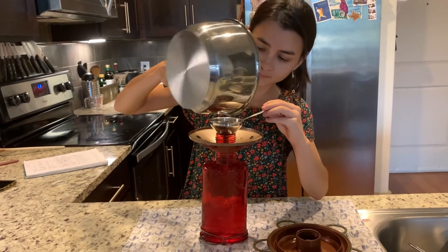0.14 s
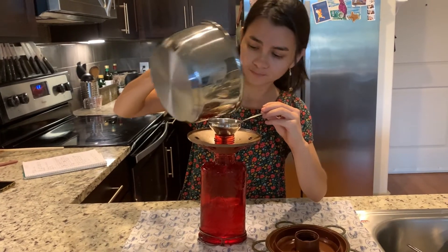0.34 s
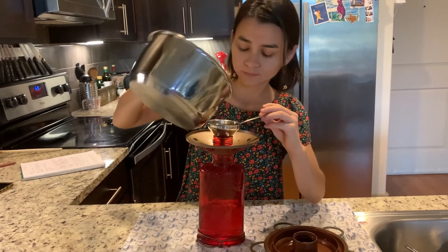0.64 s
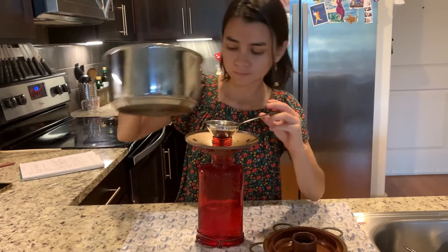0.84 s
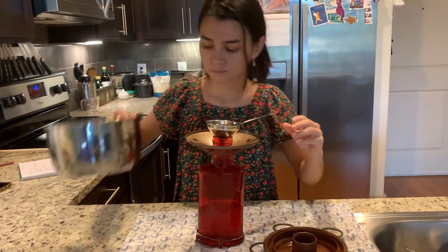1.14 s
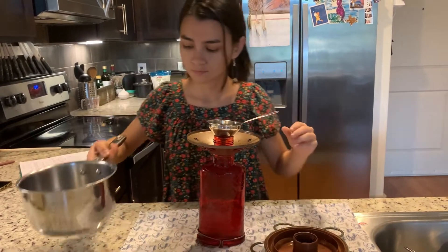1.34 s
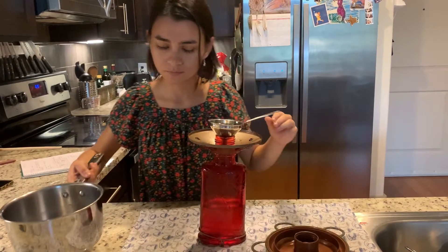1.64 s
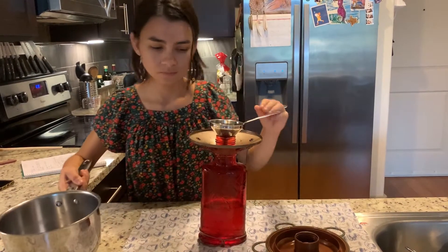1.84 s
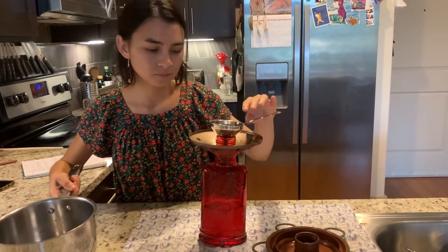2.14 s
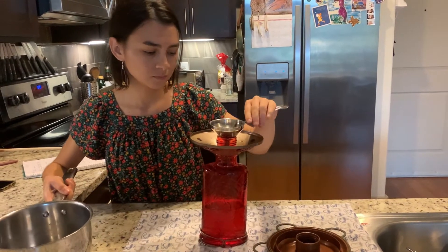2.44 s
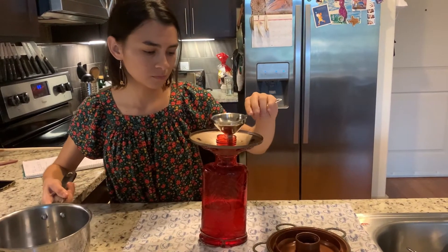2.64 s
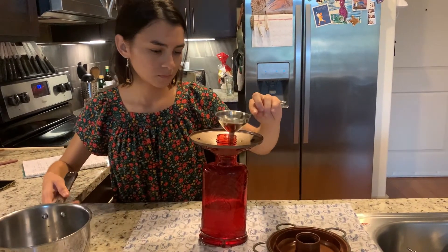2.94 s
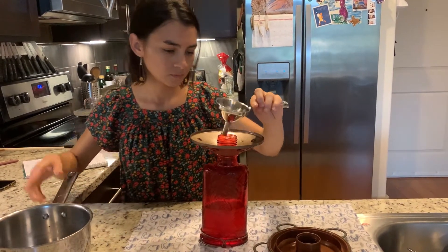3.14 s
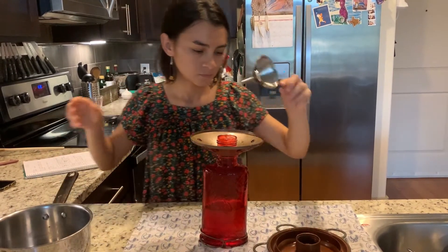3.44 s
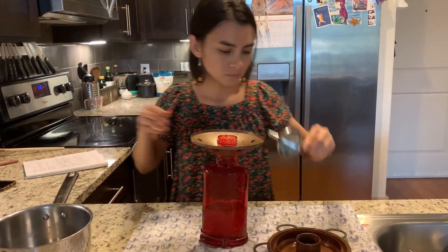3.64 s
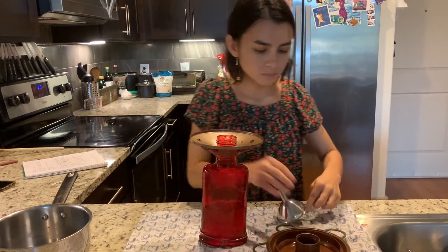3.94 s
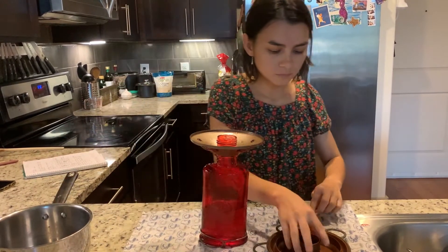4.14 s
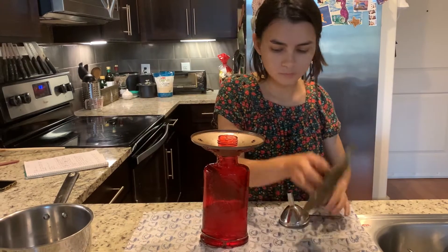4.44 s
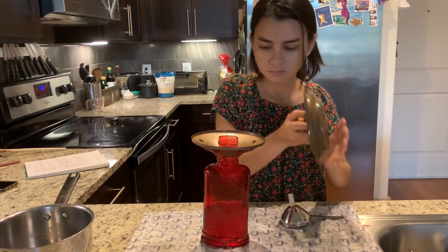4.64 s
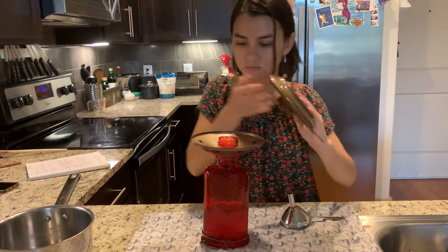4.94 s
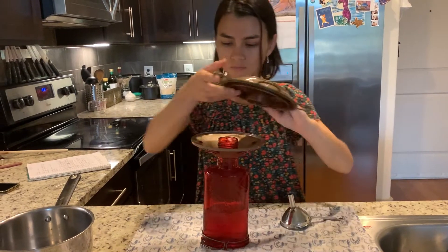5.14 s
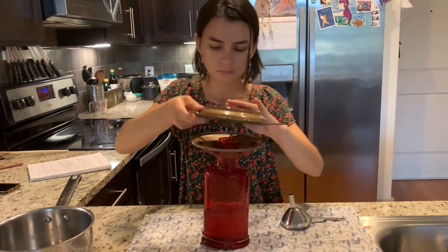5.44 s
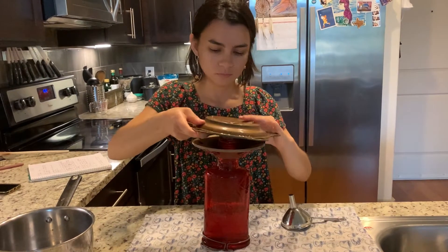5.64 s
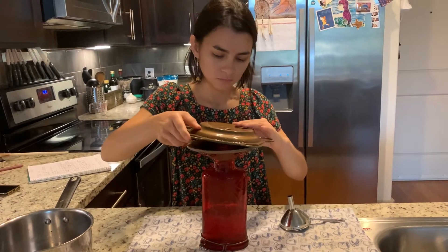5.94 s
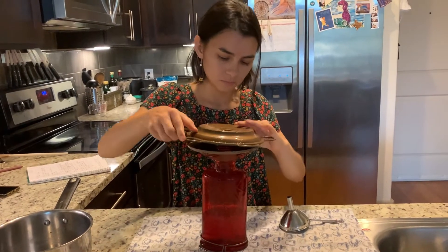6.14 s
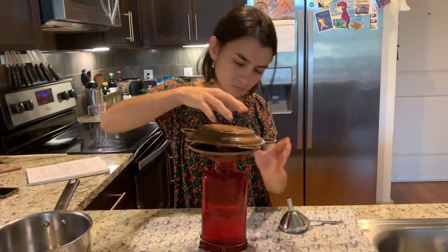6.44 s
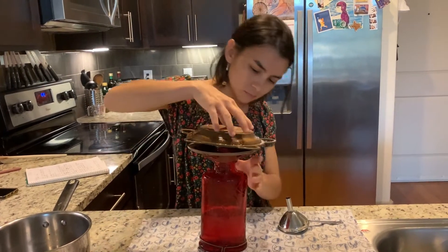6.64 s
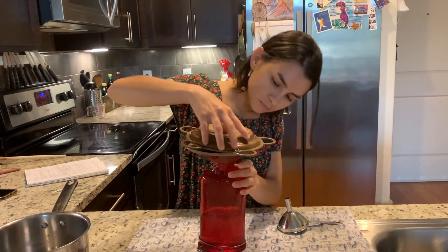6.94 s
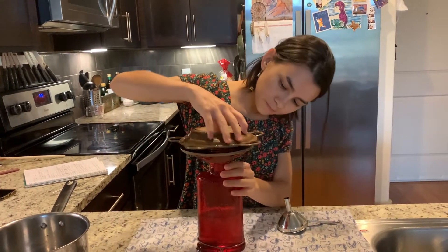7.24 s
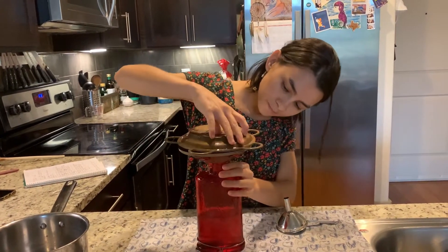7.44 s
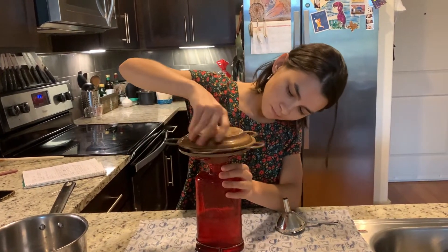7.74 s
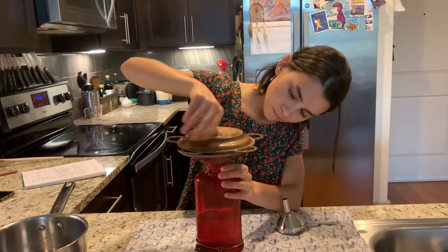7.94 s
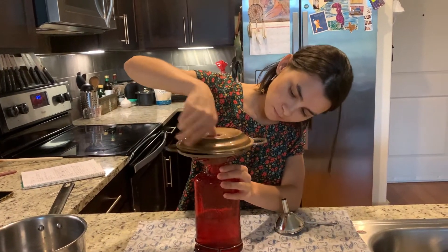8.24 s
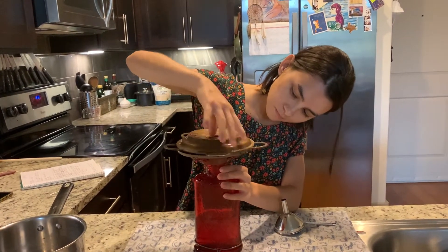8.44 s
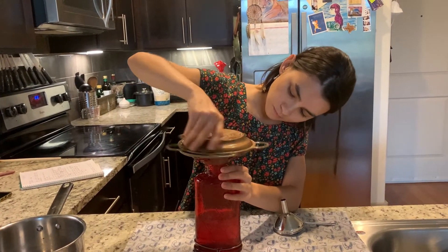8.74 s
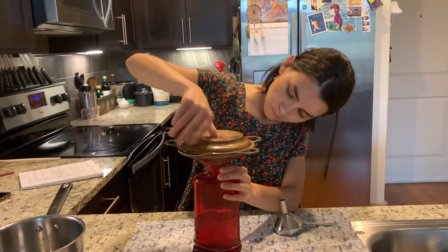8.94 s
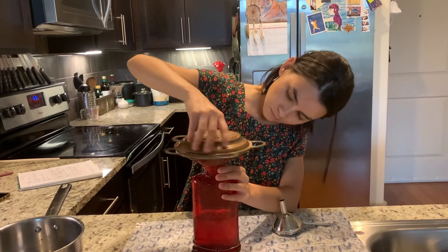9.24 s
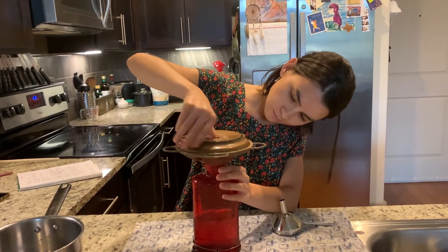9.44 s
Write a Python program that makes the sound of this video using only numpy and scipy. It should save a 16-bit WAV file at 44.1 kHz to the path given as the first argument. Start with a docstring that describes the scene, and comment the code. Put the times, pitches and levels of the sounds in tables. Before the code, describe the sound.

In a quiet kitchen a steel saucepan clanks onto a stone counter, a small funnel ticks on glass, then a ceramic dish knocks and scrapes into place.

```python
"""A quiet kitchen after the last drops have been poured; a fridge hums and hard walls ring briefly.
Small pings and soft bumps come first. A steel saucepan is set down on the stone counter as clusters of
decaying modes; a small metal funnel ticks against a glass bottle as it is lifted out, also ringing in modes.
After more soft bumps a lidded dish is lowered onto the bottle's tray: noise bursts knock and trains of tiny
slips scrape, both shaped by resonances of bottle, rim and air gap, until it has rocked into place."""
import sys
import numpy as np
from scipy import signal
from scipy.fft import rfft, irfft
from scipy.io import wavfile

SR = 44100
rng = np.random.default_rng(int(sys.argv[2]) if len(sys.argv) > 2 else 0)


def unload_wav(signal):
    """Save mono or channel-first audio to the path in sys.argv[1] as 16-bit WAV at rate SR, clipped to [-1, 1]."""
    wavfile.write(
        sys.argv[1],
        SR,
        np.round(np.clip(np.atleast_2d(signal).T, -1, 1) * 32767).astype(np.int16),
    )


N = 423360
AGE = np.arange(SR) / SR  # one second of time since a sound began [s]
TIME = np.arange(N) / SR  # time in the scene [s]

# dish knocking on the tray: (time [s], thud [dB], lower hollow note [dB], upper hollow note [dB], rim [dB], tick [dB])
DISH_KNOCKS = [(5.588, -61.5, -50.5, -73, -63, -81), (5.635, -53, -46, -68, -65, -79),
               (5.67, -58, -49, -70, -92, -93), (5.766, -54.5, -47, -41.5, -45, -51),
               (5.832, -56, -43.5, -50, -52.5, -67), (5.869, -60, -52, -52, -58, -80),
               (5.887, -49, -48, -48.5, -65, -53.5), (5.944, -60, -43, -48, -62, -41),
               (5.977, -45.5, -54, -66, -54.5, -43), (6.008, -42, -46.5, -55.5, -62, -75),
               (6.806, -54, -54, -73, -74.5, -86), (6.839, -60, -57, -80, -99, -99),
               (7.015, -59.5, -65, -71.5, -84, -94), (7.13, -66, -59, -60.5, -67, -95),
               (7.164, -65.5, -62.5, -82, -79, -94), (7.271, -58.5, -64, -66, -81, -97),
               (7.315, -61.5, -71, -72, -82, -98), (7.615, -69, -56, -64.5, -80, -89),
               (7.759, -60, -53.5, -53.5, -79, -86), (7.789, -52.5, -54, -51.5, -68, -92),
               (7.837, -47.5, -73, -53.5, -66.5, -80), (8.174, -78, -55, -50.5, -61.5, -83),
               (8.197, -41.5, -36.5, -52, -55, -69), (8.242, -66, -54, -46, -63, -82),
               (8.292, -47, -47, -45.5, -56, -68), (8.313, -42, -54, -36, -47, -62),
               (8.339, -37, -41, -44.5, -56, -74), (8.720, -56, -42, -62, -53.5, -48.5),
               (8.783, -42.5, -43, -69, -59, -53.5), (8.818, -51.5, -49, -49, -58, -57.5),
               (8.858, -60, -43.5, -44.5, -49, -53), (8.899, -52.5, -39.5, -58, -56, -58),
               (9.277, -82, -44.5, -49, -53, -42.5), (9.574, -51.5, -59, -75, -81, -66.5)]
# dish sliding on the tray: (time [s], swell [s], hold [s], judder [dB], lower hollow note [dB],
# upper hollow note [dB], rim [dB], grit [dB], pressure [0-1])
DISH_SLIDES = [(5.775, 0.014, 0.18, -47, -52, -59, -58.5, -60, 0.43),
               (5.885, 0.09, 0.075, -42, -45.5, -61.5, -76, -54, 0.9),
               (6.815, 0.01, 0.15, -55, -70, -95, -91, -99, 0.46),
               (7.131, 0.005, 0.021, -75, -65, -74, -69, -85, 0.15),
               (7.183, 0.0072, 0.11, -55, -69.5, -72, -86, -100, 0.02),
               (7.617, 0.18, 0.075, -52, -58.5, -62.5, -66.5, -78.5, 0.03),
               (8.056, 0.18, 0.025, -50, -56, -58.5, -65, -80, 0),
               (8.194, 0.15, 0.011, -33.5, -41.5, -51, -48.5, -62.5, 0.02),
               (8.675, 0.0031, 0.0076, -62, -37.5, -36, -54, -54, 0),
               (8.711, 0.0037, 0.02, -71, -47.5, -52, -48, -45, 0.67),
               (8.76, 0.014, 0.13, -41, -43, -49.5, -55, -56.5, 0.92),
               (9.136, .14, 0.086, -40.5, -44.5, -47, -48, -46, 0.86)]
# the bottle's low notes and the dish's glazed rim: (frequency [Hz], width [Hz], gain [dB])
DISH_RESONANCES = [(108.7, 15, 3), (165, 30, 9), (222.2, 15.5, 24.5), (525, 270, -1), (1060, 90, 2.5),
                   (1208, 100, -5), (2570, 75, -17), (2930, 190, 5), (3530, 120, -2), (4470, 90, 11),
                   (4770, 82, 4), (5120, 280, 1), (6594, 27, 18.5), (6680, 280, 2.5), (7340, 86, 9)]
# air gap between dish and tray: (time [s], lower note [Hz], upper note [Hz], strength [dB])
GAP_NOTES = [(5.59, 1140, 1793, -18), (5.66, 940, 1670, -8), (5.8, 858, 1670, -2.5), (6.8, 893, 1655, 1),
             (7.8, 882, 1704, 0), (8.24, 860, 1653, 2), (8.32, 864, 1667, -0.5), (8.73, 807, 1616, -0.5),
             (9.0, 790, 1626, 1), (9.15, 800, 1630, -2), (9.28, 766, 1570, -7), (9.5, 714, 1580, -4)]
# how the gap's lower and upper notes stand out: (width [Hz], gain [dB])
GAP_RESONANCES = [(150, 14), (140, 19)]
# borders between thud or judder, lower note, upper note, rim, and tick or grit: (frequency [Hz], ...)
DISH_BORDERS = (450, 1300, 2100, 3800)
# colour of glaze touching lightly: (frequency [Hz], level [dB])
GLAZE_TOUCH = [(50, -9.5), (110, 6), (240, 2), (330, -8.5), (550, -7.5), (850, -4), (1200, -5),
               (1430, -4.5), (1650, -13), (2200, -12.5), (3200, -10), (4600, -14.5), (5800, -15.5),
               (7500, -15), (10500, -17.5), (15000, -21)]
# colour of glaze ground under pressure: (frequency [Hz], level [dB])
GLAZE_GRIND = [(50, -13), (230, -2), (330, 8.5), (500, 4.5), (650, 2), (950, 2.5), (1350, -9.5), (2600, -1),
               (4600, -4.5), (5800, 0), (7500, -5.5), (10500, -9.5), (13000, -5.5), (15000, -15)]

# saucepan on the counter: (time [s], crack peak [dB], thud [dB], clang [dB], tick [dB],
# free ring against counter thump [dB], how flat the base lies [0-1])
PAN_CONTACTS = [(2.214, -13, -41, -24, -38.5, 8.5, 0.03), (2.3061, -22.5, -44.5, -29, -57, -7.5, 0.03),
                (2.579, -31, -52.5, -44.5, -77.5, -13, 0.77), (2.607, -25, -48.5, -34, -48, -13, 1),
                (2.6301, -16, -55, -34, -38.5, -22.5, 1)]
# the saucepan's strong modes: (frequency [Hz], level [dB], t60 [s])
PAN_RING = [(349, 4, .33), (630, -2, .55), (931, -15, .6), (1195, -16, .7), (1448, -3, .25), (1502, -8, .6),
            (1647, -8, .45), (1756, 8, .55), (1795, -8, .45), (1880, -9, 1.1), (1943, -15, .45),
            (2061, -13, .6), (3591, -3, .52), (5537, -4, .45), (6013, -20, .38), (6794, -8, .4),
            (7130, -22, .3), (8204, -5, .42), (9986, -14, .3), (10710, -28, .35), (12300, -20, .25)]
# the saucepan's many weak modes as one colour: (frequency [Hz], level [dB])
PAN_WEAK_MODES = [(100, -42), (250, -24), (400, -13), (700, -7), (1100, -8), (1450, -1.5), (1820, 2),
                  (2000, -10), (2300, -22), (3000, -24), (3600, -14), (4200, -47), (5000, -29), (7000, -24),
                  (9000, -32), (10500, -31), (13000, -44), (16000, -58)]
# colour of a contact with the counter: (frequency [Hz], level [dB])
COUNTER_CONTACT = [(50, -17.5), (110, 0.5), (220, -13), (450, -11.5), (620, 9.5), (800, 3), (1000, -4.5),
                   (1200, -2.5), (1550, 0), (2300, -7), (3300, -12.5), (3650, -5.5), (4100, -33.5),
                   (5200, -26.5), (6400, -20), (6850, -8), (7300, -27.5), (10500, -22), (16000, -36.5)]
# borders between thud, clang and tick: (frequency [Hz], ...)
BLOW_BORDERS = (400, 3500)

# funnel on the bottle neck: (time [s], tick peak [dB], ring [dB], pitch of the contact [Hz])
FUNNEL_TAPS = [(2.542, -13, -41.5, 11010), (2.786, -18.5, -45.5, 9800)]
# the funnel's modes: (frequency [Hz], level [dB], t60 [s])
FUNNEL_RING = [(4040, -2, .12), (4150, -6, .26), (4260, -6, .24), (4420, -10, .2), (5250, -17, .25),
               (6050, -16, .25), (7720, -5, .24), (9211, -5, .2), (9700, -10, .15), (10120, -8, .2),
               (11020, -5, .16), (11250, -4, .2), (11600, -6, .16), (14580, -14, .2), (15430, -13, .18)]
# colour of the funnel's tick: (frequency [Hz], level [dB])
FUNNEL_CONTACT = [(500, 2.5), (3000, -18), (4200, 9), (5200, -18), (6500, -24.5), (8000, 5.5), (11000, -9),
                  (13000, -26.5), (16000, 11)]

# soft bumps, touches and brushings carried by the counter: (time [s], thud [dB], knock [dB], tick [dB], t60 [s])
SOFT_BUMPS = [(1.252, -56, -81, -83, 0.13), (1.282, -66, -90, -87, .22), (1.337, -89, -90, -82.5, .15),
              (3.228, -61.5, -87, -88, 0.24), (3.268, -51, -79.5, -85, 0.26),
              (3.296, -57.5, -89, -90, 0.24), (4.402, -86, -78, -88, .04), (4.524, -85, -81, -89, 0.043),
              (4.734, -69, -66, -75, 0.26), (4.826, -79, -82, -72.5, .4), (5.258, -91, -91, -77, .1),
              (5.603, -48, -62, -86, 0.3), (5.776, -46.5, -72, -80, .22), (6.008, -44.5, -78, -85, 0.32),
              (9.152, -62, -71, -87, 0.19)]
# colour of a soft bump: (frequency [Hz], level [dB])
SOFT_CONTACT = [(40, -8), (110, 8.5), (250, -8.5), (600, -13), (1500, -9), (3500, -18.5), (11000, -20.5),
                (16000, -39)]
# pings and squeaks of the moving kitchenware: (time [s], starting pitch [Hz], peak [dB], length [s])
KITCHENWARE_PINGS = [(0.466, 1004, -62, 0.073), (0.472, 1990, -77.5, 0.037), (1.341, 2086, -68, 0.018),
                     (1.345, 2720, -78, .008), (1.342, 3370, -63.5, 0.0057), (1.351, 3900, -69, .006),
                     (5.205, 4770, -68.5, 0.015), (5.794, 3145, -49, 0.023), (5.895, 4390, -51, 0.03),
                     (5.982, 4710, -45, 0.015)]

# still air of the kitchen: (frequency [Hz], density [dB per Hz, relative])
AIR_COLOUR = [(20, -4.5), (45, -5), (72, 1.5), (150, -13.5), (357, -22), (600, -30.5), (1260, -35.5),
              (3070, -41), (7500, -44), (9700, -50), (11500, -42.5), (13000, -44), (16000, -63.5)]
# fridge hum: (frequency [Hz], level [dB])
FRIDGE_HUM = [(32.3, -69), (63, -69), (95, -72), (11278, -103)]
# decay of the wall echoes: (frequency [Hz], t60 [s])
WALL_DECAY = [(200, .36), (450, .52), (1500, .54), (4000, .53), (8000, .42), (11500, .33), (14000, .14)]
# strength of the wall echoes: (frequency [Hz], level [dB])
WALL_COLOUR = [(100, -2), (220, -0.5), (450, -1), (900, 3), (2000, -1), (5000, -4), (12000, -3.5)]
# stereo width of sound from all around: (frequency [Hz], side minus mid [dB])
ROOM_WIDTH = [(60, -16.5), (200, -10.5), (400, -4.5), (800, -1.5), (1400, -1.5), (15000, 3)]
# what the two microphones hear in common: (frequency [Hz], level [dB])
MIC_MID = [(30, 0), (7000, -2.5), (7900, -5.5), (8700, -16.5), (9500, 5), (11000, 5), (12000, -1),
           (13200, -12.5), (14500, -4), (16000, -7)]
# what differs between the two microphones: (frequency [Hz], level [dB])
MIC_SIDE = [(30, 5.5), (7000, -4.5), (8700, 4), (9600, -1), (10600, -8.5), (12000, -4), (13200, -1.5),
            (14500, -6), (16000, -4)]

BRIGHTENING = 0.35  # treble tilt [dB per octave] for each dB that a tick stands over the rim
CONTACT_S = 0.0006  # time constant of the soft onset of each dish knock
SWELL_DB, GRIT_SWELL_DB = 6, 12.5  # rise from first touch to full speed; rim and grit depend on speed the most
TOUCH_S, JUDDER_LAG_S = 0.027, 0.1  # a slide takes hold gradually; the bottle needs longer to shake
STOP_S = 0.038  # time constant of coming to rest
CATCH_S, CATCH_DB = 0.013, 1.5  # the dish advances in small jerks: their length and spread
HANDOVER_S = 0.035  # how long one point of the rim carries the sliding dish
WOBBLE, WOBBLE_S = 0.033, 0.0213  # rocking of the gap: relative spread of its notes, time between turns
SEATED_RISE, SEATED_HZ = 0.082, 2480  # lying flat raises the shell's modes, less so above this pitch
AIR_DB = -61
TOP_HZ = 15900


def dish_knocks(path):
    """The dish knocks and chatters on the tray; each contact favours other notes, and sharp ticks are brighter."""
    out = np.zeros((2, N))
    for s, *levels_db in DISH_KNOCKS:
        tilt = BRIGHTENING * (levels_db[-1] - levels_db[-2])
        contact = [(hz, db + tilt * max(np.log2(hz / DISH_BORDERS[-1]), 0)) for hz, db in GLAZE_TOUCH]
        force = burst(contact, t60=0.021) * (1 - np.exp(-AGE / CONTACT_S))
        body = air_gap(rim(force, detune=0.012, scatter_db=5.0), s)
        add(out, s, blow(body, path, levels_db, DISH_BORDERS))
    return out


def dish_slides(path):
    """The dish is nudged and turned in short slides that judder, rub and grit."""
    out = np.zeros((2, N))
    path_gain = rms(path) * np.sqrt(SR)
    for s, swell_s, hold_s, *levels_db, pressure in DISH_SLIDES:
        judder = push(swell_s, hold_s, SWELL_DB, JUDDER_LAG_S)
        rub = push(swell_s, hold_s, SWELL_DB)
        grit = push(swell_s, hold_s, GRIT_SWELL_DB)
        parts = registers(air_gap(stick_slip(pressure), s), DISH_BORDERS)
        slide = 0
        for part, db, strength in zip(parts, levels_db, [judder, rub, rub, grit, grit]):
            slide = slide + undb(db) * part / rms(part) * strength[:len(part)]
        add(out, s, heard(slide, path) / path_gain)
    return out


def stick_slip(pressure, slips_per_s=1000, spread_db=3.5, count=4):
    """Rough glaze catches and slips in a hail of tiny blows, its colour moving from touch to grind with pressure."""
    pressure, out = np.clip(pressure, 0, 1), 0
    jerks = undb(CATCH_DB * rng.standard_normal(SR)[(AGE / CATCH_S).astype(int)])
    sizes = jerks * undb(spread_db * np.minimum(rng.exponential(size=SR), 3))
    signs = rng.choice([-1, 1], SR)
    slips = sizes * signs * (rng.random(SR) < slips_per_s / SR)
    # points of the rim take turns, each with its own ring
    touching = (AGE / HANDOVER_S).astype(int) % count
    for point in range(count):
        touch = np.sqrt(1 - pressure) * burst(GLAZE_TOUCH, t60=0.0087)
        grind = np.sqrt(pressure) * burst(GLAZE_GRIND, t60=0.014)
        response = rim(touch + grind, detune=0.017, scatter_db=2.0)
        out = out + irfft(rfft(slips * (touching == point)) * rfft(response))
    return out


def push(swell_s, hold_s, rise_db, lag_s=0):
    """Strength of one slide: it gathers speed, holds it and comes to rest."""
    speed = np.minimum(AGE / max(swell_s, .005), 1)
    grip = 1 - np.exp(-AGE / (TOUCH_S + lag_s))
    rest = np.exp(-np.maximum(AGE - swell_s - hold_s, 0) / STOP_S)
    return undb(rise_db * (speed - 1)) * grip * rest


def rim(force, detune, scatter_db):
    """A force rings bottle and rim; each point of contact weights and bends their notes differently."""
    hz = np.fft.rfftfreq(len(force), 1 / SR)
    chance = rng.standard_normal((len(DISH_RESONANCES), 2))
    response = 1
    for (f, width, db), (bend, weight) in zip(DISH_RESONANCES, chance):
        centre = f * (1 + detune * bend)
        response = response + undb(db + scatter_db * weight) / (1 + 2j * (hz - centre) / width)
    return irfft(rfft(force) * response)


def air_gap(sound, s):
    """Air under the dish adds two resonances whose notes move with the gap, to a sound starting at time s."""
    x = sound[:SR * 2 // 3]
    age = AGE[:len(x)]
    times, *notes, strength_db = np.transpose(GAP_NOTES)
    strength_now_db = np.interp(s, times, strength_db)
    out = x
    for note, (width, db) in zip(notes, GAP_RESONANCES):
        wobble = np.interp(age / WOBBLE_S, np.arange(200), rng.standard_normal(200))
        hz = np.interp(s + age, times, note) * (1 + WOBBLE * wobble)
        # shift the moving note down to 0 Hz, smooth it there, then shift it back
        turn = np.exp(2j * np.pi * np.cumsum(hz) / SR)
        pole = np.exp(-np.pi * width / SR)
        smooth = signal.lfilter([(1 - pole) ** 2], [1, -2 * pole, pole ** 2], x / turn)
        out = out + 2 * undb(db + strength_now_db) * np.real(turn * smooth)
    return out


def saucepan():
    """The rim lands first and rings freely; then the base rocks flat, which stiffens the shell and lifts its modes."""
    out = np.zeros((2, N))
    path = kitchen(lag_ms=0.19, pan_db=1.0, wet_db=-2.5, early_db=0.5)
    for s, peak_db, thud_db, clang_db, tick_db, free_db, flat in PAN_CONTACTS:
        modes = [(hz * (1 + flat * SEATED_RISE / (1 + (hz / SEATED_HZ) ** 2)), db, t60)
                 for hz, db, t60 in PAN_RING]
        # a few strong modes stand over the shell's many weak ones
        strong = ring(modes, scatter_db=1.7, detune=0.0006, count=2)
        steel = strong + undb(9.5) * burst(PAN_WEAK_MODES, t60=0.33)
        thump = undb(15.5) * burst(COUNTER_CONTACT, t60=0.0293)
        add(out, s, blow(undb(free_db) * steel + thump, path, [thud_db, clang_db, tick_db]))
        add(out, s, crack(COUNTER_CONTACT, 0.015, path, peak_db, chatter_db=-7.5))
    return out


def funnel():
    """Thin steel taps the glass neck; the contact favours the modes near its own pitch."""
    out = np.zeros((2, N))
    path = kitchen(lag_ms=.03, pan_db=-0.5, wet_db=9.0, early_db=13.0)
    for s, peak_db, ring_db, contact_hz in FUNNEL_TAPS:
        modes = [(hz, db + 7 * np.exp(-((hz - contact_hz) / 700) ** 2), t60) for hz, db, t60 in FUNNEL_RING]
        steel = ring(modes, scatter_db=6.5, detune=0.008, count=3)
        body = steel + undb(-4.5) * burst(FUNNEL_CONTACT, t60=0.012)
        tick = crack(FUNNEL_CONTACT, 0.026, path, peak_db)
        add(out, s, attack(heard(body, path), ring_db) + tick)
    return out


def handling():
    """Dull damped bumps against the counter, and small pings of kitchenware that sink slightly in pitch."""
    out = np.zeros((2, N))
    path = kitchen(lag_ms=.05, pan_db=0.0, wet_db=-4.5, early_db=-14.5)
    for s, *levels_db, t60 in SOFT_BUMPS:
        add(out, s, blow(burst(SOFT_CONTACT, t60), path, levels_db))
    open_path = kitchen(lag_ms=.05, pan_db=-1.0, wet_db=-4.5, early_db=-3.0)
    for s, hz, db, length in KITCHENWARE_PINGS:
        swell = np.sin(np.pi * np.minimum(AGE / length, 1))
        tone = swell * np.sin(2 * np.pi * hz * AGE * (1 - 0.21 * AGE))
        x = heard(tone, open_path)
        add(out, s, x * undb(db) / np.abs(x).max())
    return out


def room_tone(pan_db=-1.0):
    """Coloured noise makes low rumble and faint hiss; steady sines make the fridge's hum."""
    # the first second, where the colour filter starts up, is dropped
    air = np.array([colour(channel, AIR_COLOUR) for channel in diffuse(N + SR)])[:, SR:]
    hum = 0
    for hz, db in FRIDGE_HUM:
        hum = hum + np.sqrt(2) * undb(db) * np.sin(2 * np.pi * (hz * TIME + rng.random()))
    return (air * undb(AIR_DB) / rms(air) + hum) * balance(pan_db)


def kitchen(lag_ms, pan_db, wet_db, early_db):
    """Path to the two microphones: direct sound (left first), quick echoes off the counter, then the walls."""
    hz, field = np.fft.rfftfreq(SR, 1 / SR), rfft(diffuse(SR))
    centres = [f for f, _ in WALL_DECAY]
    tail = 0
    # overlapping bands, each dying away at its own rate
    for own, (_, t60) in zip(np.eye(len(centres)), WALL_DECAY):
        tail = tail + irfft(field * along(list(zip(centres, own)), hz)) * fade(t60)
    tail = np.array([colour(channel, WALL_COLOUR) for channel in tail]) * (1 - np.exp(-AGE / 0.0018))
    early = diffuse(SR) * fade(0.037) * (1 - np.exp(-AGE / 0.00021))
    path = (undb(wet_db) * tail / rms(tail) + undb(early_db) * early / rms(early)) / np.sqrt(SR)
    path[0, 0] += 1
    path[1, int(abs(lag_ms) * SR / 1000)] += 1
    return path * balance(pan_db)


def diffuse(size):
    """Stereo noise from all around: alike in the bass, ever less alike towards the treble."""
    mid, side = rfft(rng.standard_normal((2, size)))
    share = undb(along(ROOM_WIDTH, np.fft.rfftfreq(size, 1 / SR)))
    return irfft(np.array([mid + share * side, mid - share * side]) / np.sqrt(1 + share ** 2), size)


def blow(body, path, levels_db, borders=BLOW_BORDERS):
    """The weight and hardness of a blow set its parts from low to high; the lows take longer to swell."""
    lengths = [.08] + [.027] * len(borders)
    parts = registers(heard(body, path), borders)
    return sum(attack(part, db, length) for part, db, length in zip(parts, levels_db, lengths))


def crack(points, t60, path, peak_db, chatter_db=-3):
    """The first hard instant of contact: one sharp push and a brief chatter."""
    snap, chatter = colour(signal.unit_impulse(SR), points), burst(points, t60)
    x = heard(snap / rms(snap) + undb(chatter_db) * chatter / rms(chatter), path)
    return x * undb(peak_db) / np.abs(x).max()


def ring(modes, scatter_db, detune, count=1):
    """Decaying modes, each a cluster of close partials that beat; every contact weights them differently."""
    partials = np.repeat(np.array(modes, float), count, axis=0)
    chance = rng.standard_normal((len(partials), 2))
    signs = np.repeat(rng.choice([-1, 1], len(modes)), count)
    out = np.zeros(SR)
    for (hz, db, t60), (weight, bend), sign in zip(partials, chance, signs):
        age = AGE[:int(2 * t60 * SR)]
        strength = sign * undb(db + scatter_db * weight) * np.exp(-np.log(1000) * age / t60)
        out[:len(age)] += strength * np.sin(2 * np.pi * hz * (1 + detune * bend) * age)
    return out / np.sqrt(count)


def burst(points, t60):
    """A dense, quickly damped cluster of resonances: coloured decaying noise of about unit starting strength."""
    envelope = fade(t60)
    x = colour(rng.standard_normal(SR) * envelope, points)
    return x * rms(envelope) / rms(x)


def attack(x, db, length=0.037):
    """Sets the RMS level of a sound's first moments (length in seconds)."""
    return x * undb(db) / rms(x[:, :int(length * SR)])


def heard(x, path):
    """A sound carried along a path to both microphones."""
    return signal.fftconvolve(x[None], path, axes=1)[:, :len(x)]


def add(out, s, sound):
    """Mixes a sound in at time s."""
    i = int(s * SR)
    out[:, i:i + sound.shape[1]] += sound[:, :N - i]


def registers(x, borders):
    """The parts of a sound between the given frequencies, from low to high."""
    cuts = [(borders[0], "low")]
    cuts += [(pair, "band") for pair in zip(borders, borders[1:])]
    cuts += [(borders[-1], "high")]
    # the tiny offset keeps silent filters from slowing down
    return [signal.sosfilt(signal.butter(3, hz, kind, fs=SR, output="sos"), x + 1e-18) for hz, kind in cuts]


def colour(x, points, size=4096):
    """Causal minimum-phase filter with the given (frequency [Hz], level [dB]) shape."""
    cepstrum = irfft(np.log(undb(along(points, np.fft.rfftfreq(size, 1 / SR)))))
    # folding the cepstrum forward puts the response's energy as early as possible
    cepstrum[1:size // 2] *= 2
    cepstrum[size // 2 + 1:] = 0
    return signal.fftconvolve(x, irfft(np.exp(rfft(cepstrum))))[:len(x)]


def along(points, hz):
    """Reads (frequency [Hz], value) points on a log-frequency axis."""
    f, value = np.transpose(points)
    return np.interp(np.log(np.maximum(hz, 1)), np.log(f), value)


def fade(t60):
    """One second of exponential decay, falling 60 dB in t60 seconds."""
    return np.exp(-np.log(1000) * AGE / t60)


def balance(pan_db):
    """Gains that set the left channel pan_db above the right."""
    return undb(np.array([[pan_db], [-pan_db]]) / 2)


def undb(db):
    """Decibels to amplitude."""
    return 10 ** (np.asarray(db) / 20)


def rms(x):
    """Root-mean-square strength, kept just above zero."""
    return np.sqrt(np.mean(x ** 2)) + 1e-12


def scene():
    """All sources share one kitchen; knocks and slides of the dish share one path."""
    tray = kitchen(lag_ms=.05, pan_db=0.0, wet_db=-2.0, early_db=4.5)
    return room_tone() + saucepan() + funnel() + dish_knocks(tray) + dish_slides(tray) + handling()


def record(dry):
    """The microphone pair colours mid and side differently, and a steep low-pass cuts the top edge."""
    mid = colour((dry[0] + dry[1]) / 2, MIC_MID)
    side = colour((dry[0] - dry[1]) / 2, MIC_SIDE)
    edge = signal.ellip(8, .2, 70, TOP_HZ, fs=SR, output="sos")
    return signal.sosfilt(edge, np.array([mid + side, mid - side]))


dry = scene()
out = record(dry)
unload_wav(out)
```